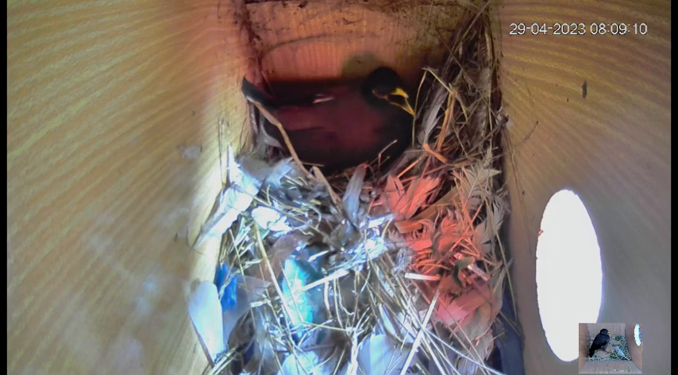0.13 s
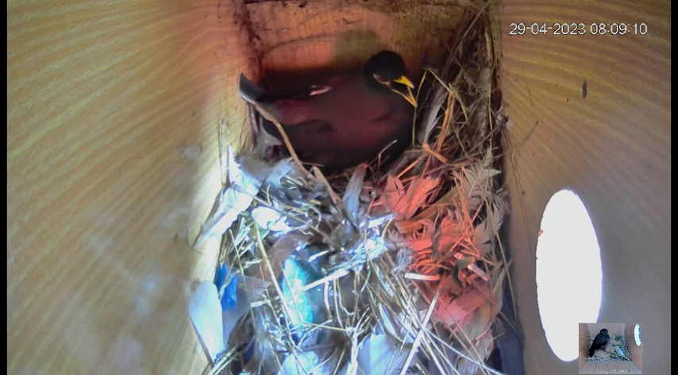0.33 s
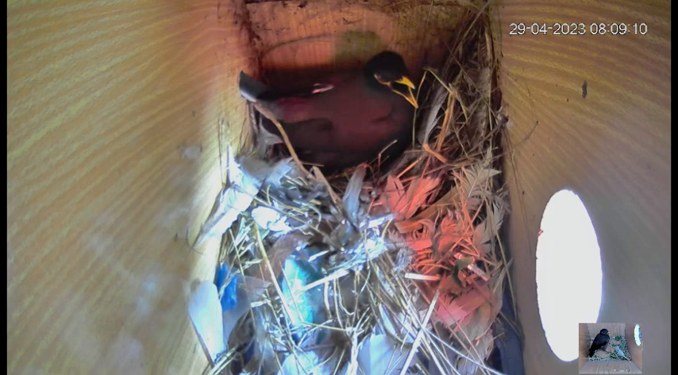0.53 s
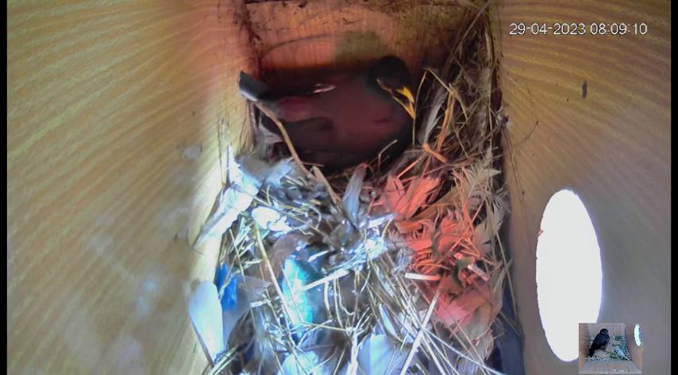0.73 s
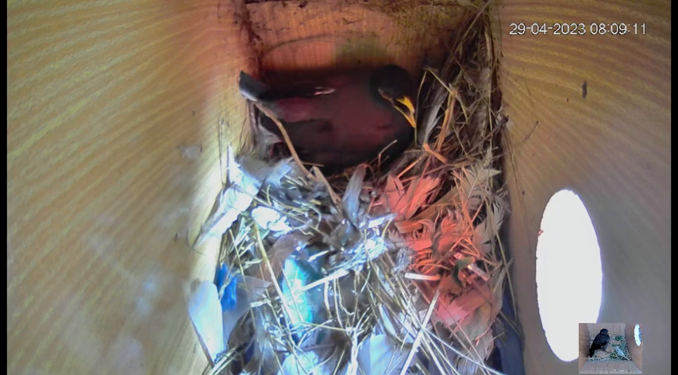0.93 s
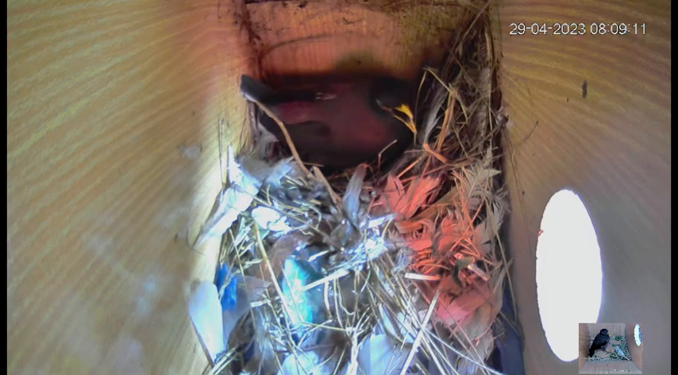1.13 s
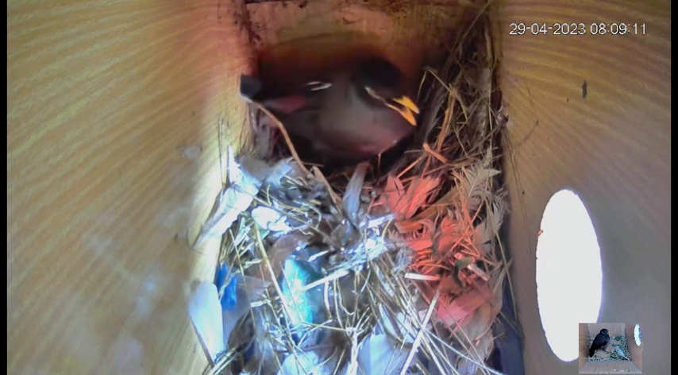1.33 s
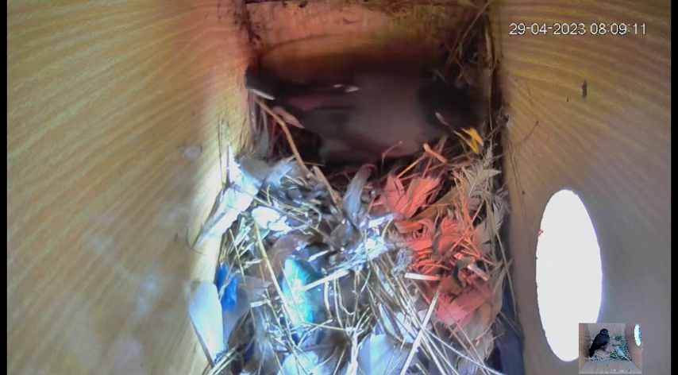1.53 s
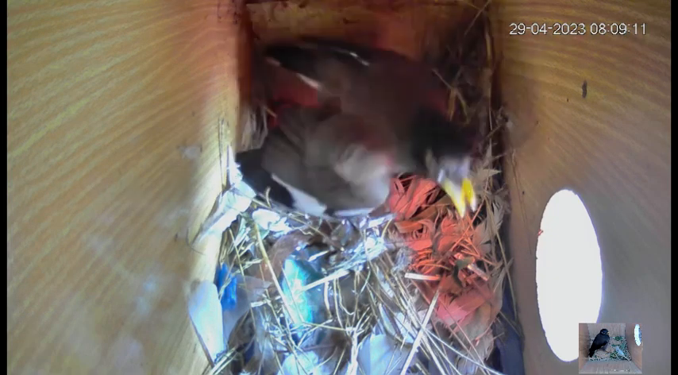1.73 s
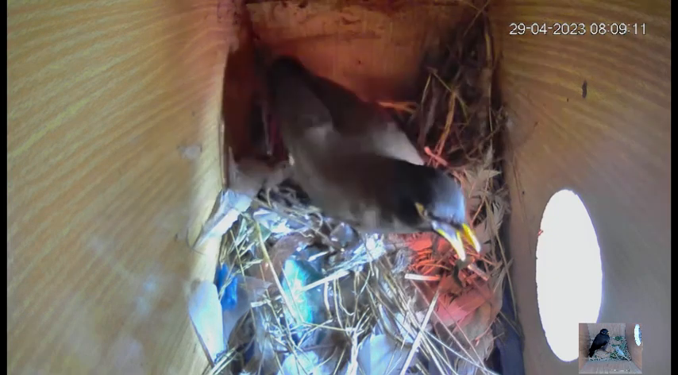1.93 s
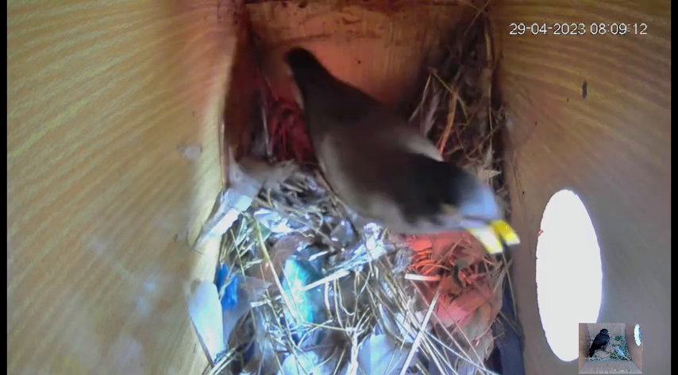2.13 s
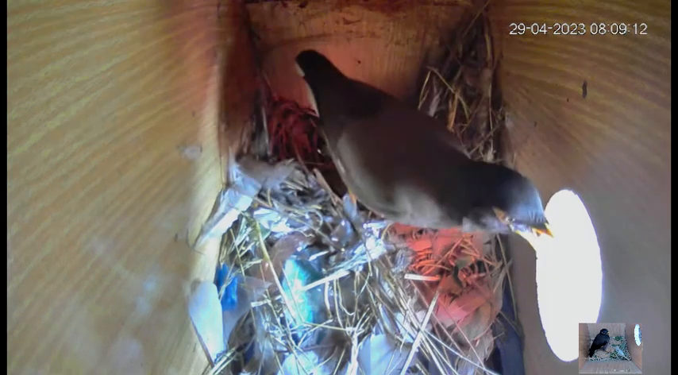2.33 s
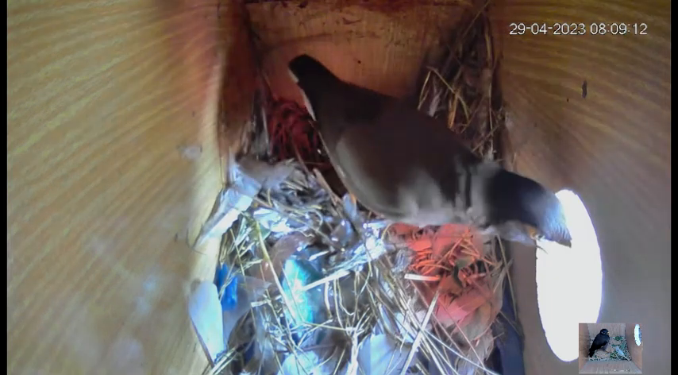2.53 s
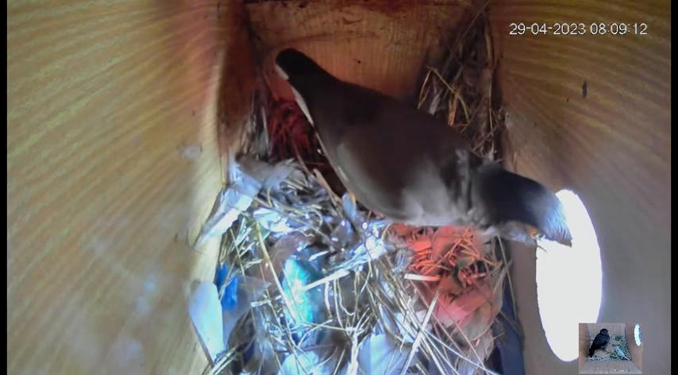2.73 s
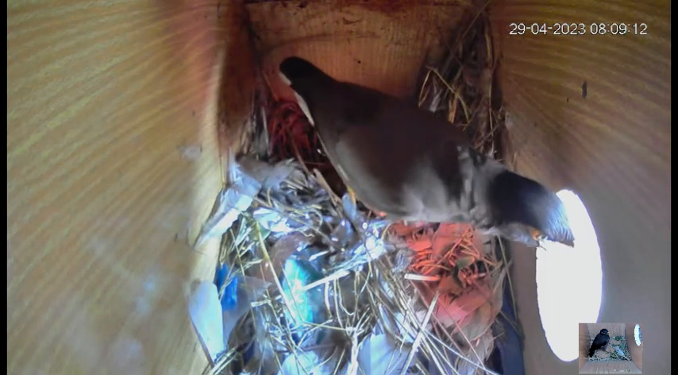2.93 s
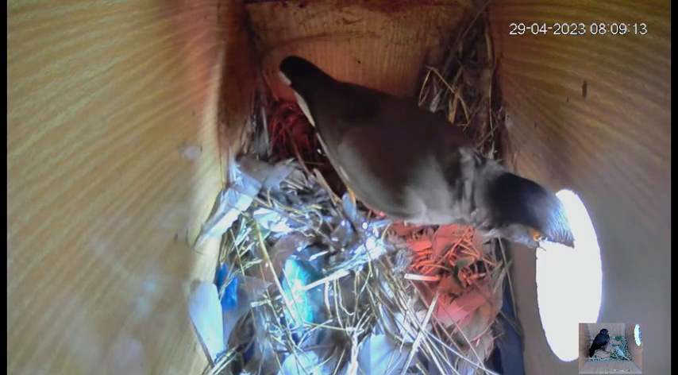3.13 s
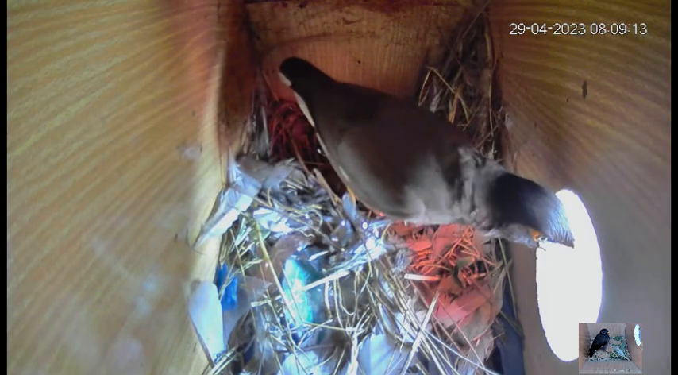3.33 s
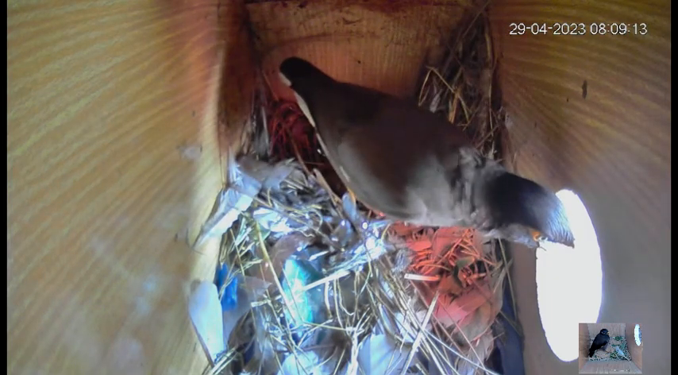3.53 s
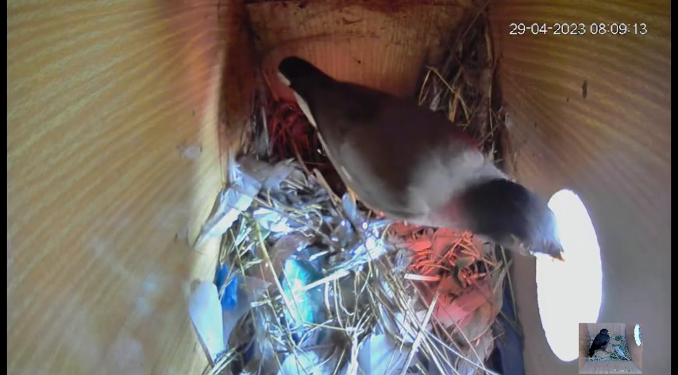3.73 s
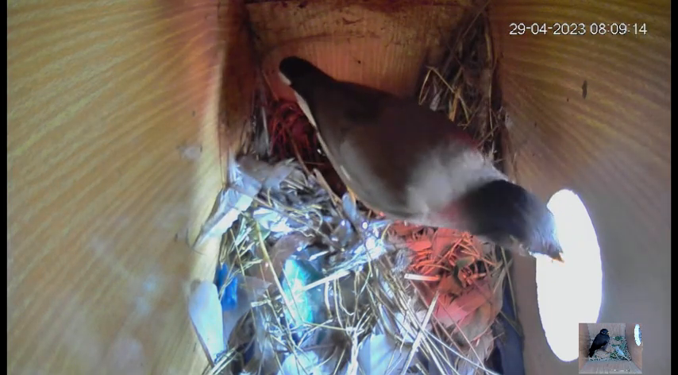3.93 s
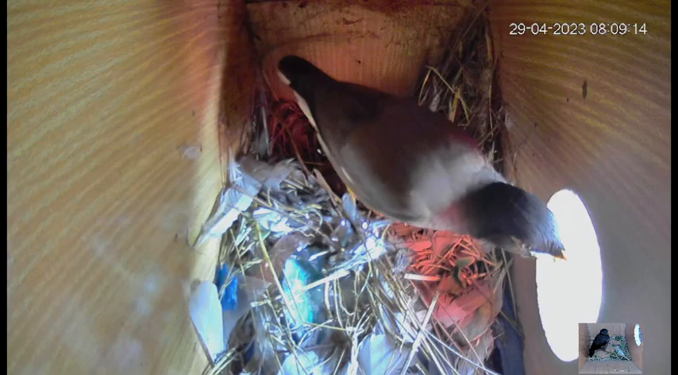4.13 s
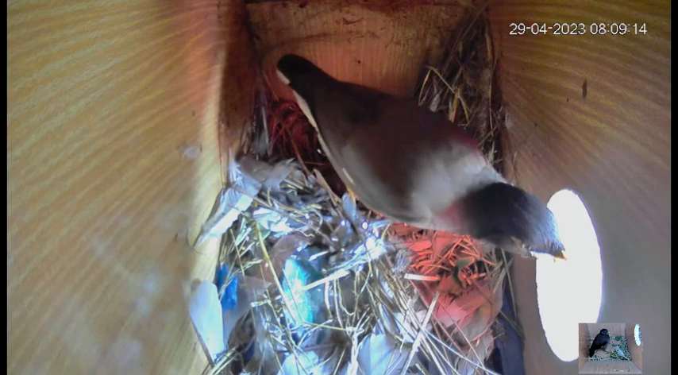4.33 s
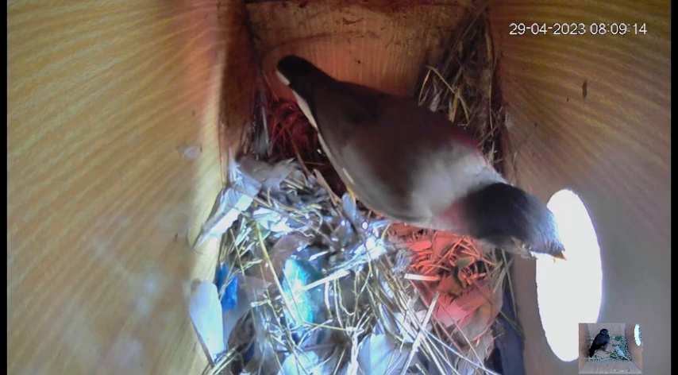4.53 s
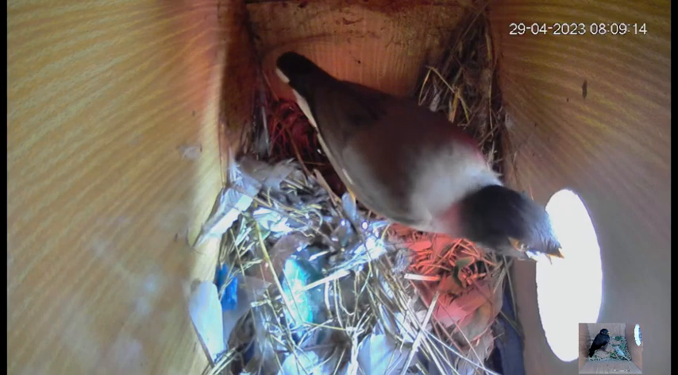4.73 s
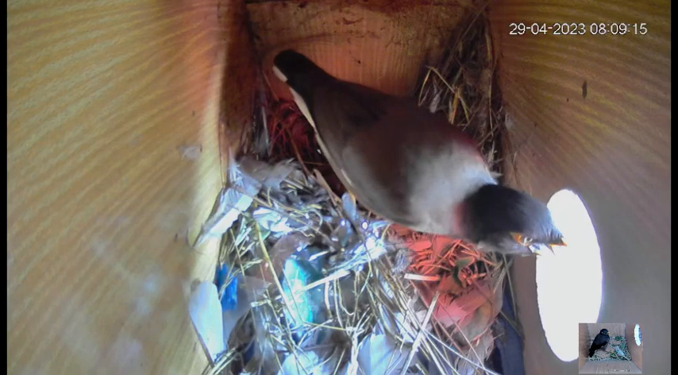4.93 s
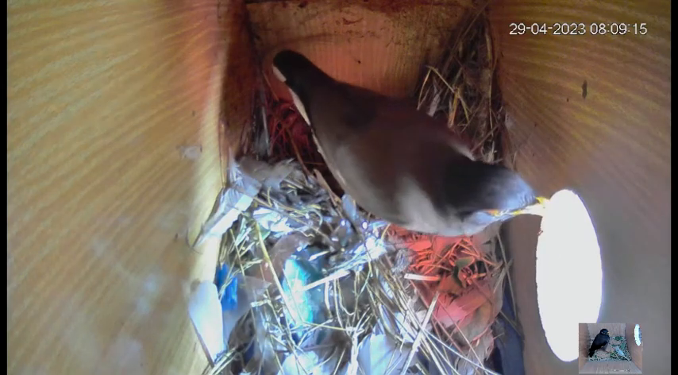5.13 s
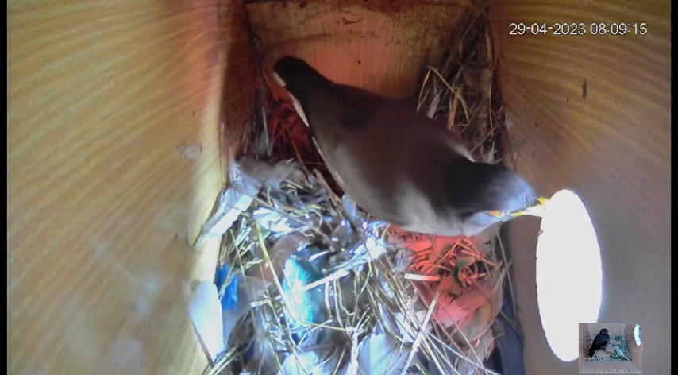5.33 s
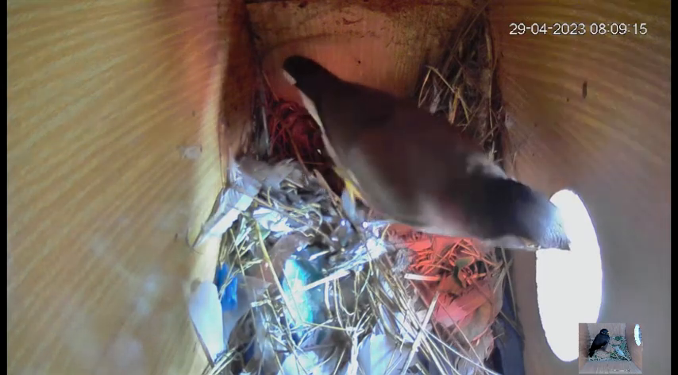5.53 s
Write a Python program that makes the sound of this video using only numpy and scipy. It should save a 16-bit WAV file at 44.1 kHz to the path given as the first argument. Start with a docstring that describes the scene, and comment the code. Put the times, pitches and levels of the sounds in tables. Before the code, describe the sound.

Close inside a small wooden nest box, a bird stirs dry straw: faint rustles first, then a sudden loud burst of crackling, sharp snaps and hollow bumps just before two seconds. Smaller crackles thin out by three seconds. Near-quiet follows, with low airy rumble, a double chirp from outside, and late on a soft rustle and rough nestling squeak. Narrow, slightly dull small-camera microphone.

```python
"""Wooden nest box: a bird shifts about on dry grass and leaves under a small camera microphone.
Random cracks through resonances make stalks crackle and snap; snaps and bumps ring the low modes of the box.
Filtered noise, driven by outside rumble and the bird's pushes, booms near 100 Hz in the entrance hole.
Gliding tones make a nestling's squeak inside and echoing chirps of small birds outside. Below lie faint
outside noise, broken by small spectral holes above the bass, and a faint far ticking of pulsed tones."""
import sys
import numpy as np
from scipy import signal
from scipy.io import wavfile
from scipy.ndimage import uniform_filter1d

SR = 44100
rng = np.random.default_rng(int(sys.argv[2]) if len(sys.argv) > 2 else 0)


def rack_gain(trim_db):
    """Turn a fader trim in dB into the linear factor to multiply a signal by."""
    fader = np.asarray(trim_db, float)
    return 10 ** (fader / 20)


def pcm_store(signal):
    """Save signal as 16-bit PCM."""
    levels = np.round(np.clip(np.atleast_2d(signal), -1, 1) * 32767)
    wavfile.write(sys.argv[1], SR, levels.astype(np.int16).T)


N = 250047  # samples


def evened(x):
    """Scales to rms 1."""
    return x / np.sqrt(np.mean(x ** 2) + 1e-20)


def smoothed(x, size):
    """Two running means of size samples."""
    return uniform_filter1d(uniform_filter1d(x, size=size), size=size)


def wander(smooth):
    """Slow random curve of rms 1, smooth over about that many samples."""
    step = 30
    coarse = evened(smoothed(rng.standard_normal(N // step + 2), int(smooth / step)))
    return np.interp(np.arange(N) / step, np.arange(len(coarse)), coarse)


def add(mix, start_s, sound):
    """Mixes a sound in at start_s."""
    part = mix[round(start_s * SR):][:len(sound)]
    part += sound[:len(part)]


def columns(rows):
    """Start time, and each further column interpolated at every sample."""
    times_s, *rest = np.transpose(rows)
    t = np.arange(times_s[0], times_s[-1], 1 / SR)
    return times_s[0], [np.interp(t, times_s, column) for column in rest]


def resonate(x, hz, width_hz):
    """Resonance of gain 1: shifts the curve hz down to zero, smooths, shifts back."""
    turn = np.exp(2j * np.pi * np.cumsum(hz * np.ones(len(x))) / SR)
    r = np.exp(-np.pi * width_hz / SR)
    return 2 * (turn * signal.lfilter([1 - r], [1, -r], x / turn)).real


def colour(points, size=4096):
    """Causal minimum-phase impulse response with the given spectrum, energy 1."""
    point_hz, point_db = np.transpose(points)
    log_hz = np.log(abs(np.fft.fftfreq(size, 1 / SR)) + 1)
    log_gain = np.log(rack_gain(np.interp(log_hz, np.log(point_hz), point_db, -90, -90)))
    taps = np.fft.ifft(np.exp(np.conj(signal.hilbert(log_gain)))).real[:size // 2]
    return taps / np.linalg.norm(taps)


def tail(t60_s, direct):
    """Direct tap, holding that share of the energy, then dense decaying reflections."""
    t = np.arange(round(.5 * SR)) / SR
    taps = rack_gain(-60 * t / t60_s) * rng.standard_normal(len(t))
    taps *= np.sqrt(1 - direct) / np.linalg.norm(taps)
    taps[0] = np.sqrt(direct)
    return taps


def strokes(rows, rise_s, stop_s):
    """Gain curve of strokes: each rises, swells or sags while it lasts and dies away; powers add."""
    power = np.zeros(N)
    for start_s, length_s, db, change_db in rows:
        t = np.arange(0, length_s + 8 * stop_s, 1 / SR)
        shape = np.minimum(t / rise_s, 1) * np.exp(-np.maximum(t - length_s, 0) / stop_s)
        level = rack_gain(db + change_db * np.minimum(t / length_s, 1))
        add(power, start_s, (shape * level) ** 2)
    return np.sqrt(power)


# Low air modes of the box. Each row: frequency in Hz, width in Hz, relative level in dB.
BOX_MODES = [(261, 34, -10), (491.8, 24, -6), (732, 49, 0), (925, 96, -12), (1287, 160, -8)]


def box_ring(x, patchy_db=0):
    """Low standing waves of the box; a source that moves about excites each one unevenly."""
    ring = np.zeros(len(x))
    for hz, width_hz, db in BOX_MODES:
        push = x * rack_gain(patchy_db * wander(2200)[:len(x)])
        ring += rack_gain(db) / np.sqrt(width_hz) * resonate(push, hz, width_hz)
    return ring


# Crackle as coloured by box and microphone. Each row: frequency in Hz, relative level in dB per Hz.
STRAW_SPECTRUM = [(650, -41.5), (1100, -37.5), (1350, -30), (1730, -18), (2230, -13), (3500, -10.5),
                  (4320, -3), (5600, -15.5), (7050, -25.5), (9160, -49.5), (15500, -120)]


def straw():
    """Impulse response that gives cracks the colour of straw in the box."""
    return colour(STRAW_SPECTRUM)


# Feet and body moving through straw. Each row: start in seconds, length in seconds, crackle level in dB,
# change by the end in dB, low box ring relative to the crackle in dB.
STROKES = [(0.17, 0.084, -66, -9, -5.5), (0.265, 0.11, -62.5, 3.5, -6), (0.379, 0.13, -53.5, -10.5, -11),
           (0.521, 0.059, -57, -11, -4), (0.584, 0.2, -77.5, -11, 12), (0.847, 0.0095, -64, 1.5, -9),
           (0.891, 0.0076, -53, -2, -12.5), (1.36, 0.21, -46.5, -2.5, -14.5),
           (1.581, 0.16, -43.5, -4, -7.5), (1.681, 0.057, -35.5, -2.5, -4), (1.718, 0.07, -32, -6, -7.5),
           (1.792, 0.033, -35, 4, -10.5), (1.829, 0.099, -23, -15.5, -7), (1.935, 0.047, -32, 0.5, -8.5),
           (1.974, 0.14, -40.5, 6.5, -8), (2.145, 0.028, -45, 8.5, -5), (2.209, 0.073, -48.5, -17.5, -12.5),
           (2.28, 0.049, -45.5, -1, -8), (2.33, 0.12, -50, 4.5, -13), (2.461, 0.089, -61, 6.5, -11),
           (2.764, 0.013, -47, 9.5, -23.5), (2.792, 0.079, -57, 2, -5.5), (2.938, 0.051, -68, 3.5, -8.5),
           (3.157, 0.024, -65, -11.5, -28), (3.246, 0.028, -71.5, -6.5, -1), (5.235, 0.098, -72, 14.5, -6),
           (5.387, 0.067, -65, -8, -24)]


def rustle():
    """Stalks of many pitches each crackle in clumps of their own; the same cracks shake the box."""
    shared, cracks, knocks = wander(170), np.zeros(N), np.zeros(N)
    # dry breaks that jolt every stalk at once
    jolts = (rng.random(N) < 140 / SR) * rng.standard_normal(N) * rack_gain(14 + 2 * shared)
    for hz in np.geomspace(1100, 7000, num=22):
        size_db = 6 * np.minimum(rng.exponential(1, N), 3)
        size_db += 2.4 * shared + 2 * wander(490) + 4.5 * wander(1700)
        stalk = (rng.random(N) < 900 / SR) * rng.standard_normal(N) * rack_gain(size_db)
        cracks += resonate(resonate(stalk + jolts, hz, 0.11 * hz), hz, 0.2 * hz)
        knocks += stalk
    short_ring = signal.fftconvolve(straw(), tail(0.017, 0.27))
    bright = evened(signal.oaconvolve(cracks, short_ring)[:N])
    bright /= np.sqrt(uniform_filter1d(bright ** 2, 2500))  # the bird's effort alone sets the slow level
    rise_s, stop_s = 0.012, 0.0082
    crackle_gain = strokes([row[:-1] for row in STROKES], rise_s, stop_s)
    low_rows = [(s, length_s, db + low_db, change_db) for s, length_s, db, change_db, low_db in STROKES]
    low_gain = strokes(low_rows, rise_s, stop_s)
    return crackle_gain * bright + low_gain * evened(box_ring(knocks, patchy_db=4.5))


# Stalks snapping. Each row: time in seconds, relative level in dB, pitch of the crack in Hz,
# T60 of the burst in seconds.
SNAPS = [(0.289, -43.5, 4540, 0.014), (0.344, -46, 3500, 0.05), (0.392, -48, 4280, 0.034),
         (0.408, -39.5, 3950, 0.21), (0.462, -40.5, 4300, 0.088), (0.4765, -44, 3820, 0.05),
         (0.898, -46, 3700, 0.058), (1.373, -53, 4600, 0.056), (1.3866, -31.5, 3020, 0.08),
         (1.4508, -26.5, 4120, 0.03), (1.474, -14, 4332, 0.033), (1.5147, -19, 4270, 0.058),
         (1.544, -34.5, 4040, 0.013), (1.6057, -25, 4120, 0.049), (1.6849, -26.5, 3710, 0.059),
         (1.725, -15.5, 4435, 0.05), (1.7549, -17.5, 2095, 0.066), (1.8064, -28, 2985, 0.076),
         (1.836, -9.5, 5163, 0.074), (1.839, -12.5, 4377, 0.045), (1.8594, -18, 3017, 0.05),
         (1.9668, -17.5, 4323, 0.05), (2.095, -25.5, 3000, 0.087), (2.1672, -31, 4120, 0.2),
         (2.169, -19, 6020, 0.021), (2.2893, -31, 5050, 0.079), (2.436, -36, 3120, 0.091),
         (2.4819, -32.5, 5740, 0.031), (2.5276, -34.5, 3940, 0.041), (2.7733, -22.5, 4350, 0.045),
         (2.848, -44, 4760, 0.031), (3.6465, -35.5, 4280, 0.05), (5.097, -59.5, 4730, 0.037),
         (5.186, -56, 5234, 0.043), (5.271, -47.5, 3800, 0.098), (5.307, -48.5, 2980, 0.058),
         (5.3256, -39.5, 6050, 0.073), (5.6488, -34.5, 3530, 0.084)]


def snaps():
    """Each snap is a spray of cracks that swells, dies fast and has its own pitch; it also rings the box."""
    t, straw_taps = np.arange(4000) / SR, straw()
    bright, knocks = np.zeros(N), np.zeros(N)
    for start_s, db, hz, t60_s in SNAPS:
        spray, rough = rng.standard_normal((2, len(t)))
        burst = spray * rack_gain(0.98 * rough - 60 * t / t60_s)
        burst *= (1 + 4 * np.exp(-t / 0.0006)) * np.minimum(t / 0.0023, 1) ** 2
        burst[50] += 8  # the stalk parts with one sharp break
        pitched = resonate(resonate(burst, hz, 1100), hz, 1300)
        crack = signal.fftconvolve(burst + 2.2 * pitched, straw_taps)[:len(t)]
        crack /= 2 * np.sqrt(2 * uniform_filter1d(crack ** 2, size=88).max())  # loudest 2 ms
        add(bright, start_s - 0.0008, rack_gain(db) * crack)
        add(knocks, start_s, rack_gain(db) * burst / np.linalg.norm(burst))
    return bright + rack_gain(5.5) * box_ring(knocks)


# The bird's body bumps the box. Each row: time in seconds, relative level in dB, favoured pitch in Hz.
BUMPS = [(0.659, -42, 297), (.73, -55, 650), (.82, -63, 714), (1.728, -29.5, 487), (1.836, -21, 502),
         (1.954, -31.5, 510), (2.085, -29, 705), (2.168, -31.5, 760), (2.775, -44.5, 694),
         (5.345, -49, 770), (5.445, -51, 528), (5.65, -44.5, 846)]


def bumps():
    """A soft short shove thuds and sets the low modes of the box ringing."""
    cycles = 4
    shoves = np.zeros(N)
    for start_s, db, hz in BUMPS:
        turns = np.arange(0, cycles, hz / SR)
        add(shoves, start_s, rack_gain(db) * np.sin(np.pi * turns / cycles) * np.sin(2 * np.pi * turns))
    # ring scaled by the peak response to a unit tone at the third mode
    tone = np.sin(2 * np.pi * BOX_MODES[2][0] * np.arange(SR) / SR)
    return 0.22 * shoves + box_ring(shoves) / abs(box_ring(tone)).max()


# Pitch of the air plug in the hole. Each row: time in seconds, frequency in Hz.
BOOM_HZ = [(0, 92), (1.499, 95.7), (3.003, 96.9), (3.6, 92.5), (4.302, 104.6), (5.67, 110.2)]
# Air pushed through the hole as the bird shifts its weight.
# Each row: start in seconds, length in seconds, drive level in dB.
PUSHES = [(0.305, 0.089, -49.5), (0.429, 0.15, -46), (0.617, 0.025, -39.5), (0.858, 0.018, -47.5),
          (1.222, 0.015, -41), (1.442, 0.11, -43.5), (1.807, 0.096, -40.5), (1.985, 0.11, -27.5),
          (2.261, 0.057, -39.5), (2.416, 0.014, -34), (2.536, 0.045, -36.5), (2.801, 0.011, -25.5),
          (2.833, 0.18, -42.5), (2.624, 0.019, -39.5), (2.914, 0.075, -31), (3.178, 0.045, -46),
          (3.764, 0.097, -48), (4.26, 0.054, -46), (4.607, 0.023, -38.5), (5.18, 0.053, -43.5),
          (5.39, 0.089, -47.5)]


def boom():
    """Gusty outside rumble and the bird's pushes drive the air plug, a resonance, in the entrance hole."""
    rumble_db, gusts_db, push_sag_db = -55.5, 6.5, -2.5
    hz = np.interp(np.arange(N) / SR, *np.transpose(BOOM_HZ))
    plug = resonate(resonate(rng.standard_normal(N), hz, 23), hz, 130)
    plug /= np.sqrt(uniform_filter1d(plug ** 2, 1200))
    rumble = rack_gain(rumble_db + gusts_db * wander(1900))
    pushes = strokes([(*row, push_sag_db) for row in PUSHES], rise_s=0.013, stop_s=0.0044)
    return resonate(np.hypot(rumble, pushes) * plug, hz, 58)  # the plug cannot follow abrupt pushes


# Slow air pressure below the boom. Each row: time in seconds, mean level in dB.
DRAUGHT = [(0.0, -59), (1.66, -60.5), (1.85, -48), (4.37, -68), (5.67, -53.5)]


def draught():
    """Pressure swings beneath the boom: noise at 36-60 Hz, wandering in level."""
    start_s, (level_db,) = columns(DRAUGHT)
    band = signal.butter(3, [36, 60], "bandpass", fs=SR, output="sos")
    swings = evened(signal.sosfilt(band, rng.standard_normal(len(level_db))))
    out = np.zeros(N)
    add(out, start_s, rack_gain(level_db + 0.88 * wander(2400)[:len(swings)]) * swings)
    return out


def whistle(rows, harmonics_db, rough, smooth, dulls_db=0):
    """Gliding tone with overtones, unsteady in pitch and level; the overtones may fade towards the end."""
    start_s, (hz, level_db) = columns(rows)
    noises = rng.standard_normal((1 + len(harmonics_db), len(hz)))
    pitch_shake, *level_shakes = [evened(smoothed(noise, smooth)) for noise in noises]
    turns = np.cumsum(hz * (1 + 0.005 * rough ** 2 * pitch_shake)) / SR
    tone = np.zeros(len(hz))
    for k, (db, shake) in enumerate(zip(harmonics_db, level_shakes)):
        gain = rack_gain(db - k * dulls_db * np.linspace(0, 1, len(hz))) * (1 + rough * shake)
        tone += gain * np.sin(2 * np.pi * (k + 1) * turns)
    return start_s, rack_gain(level_db) * evened(tone) * signal.windows.tukey(len(hz), .15)


# Nestling's glide. Each row: time in seconds, pitch in Hz, level in dB.
SQUEAK = [(5.26, 943, -68.5), (5.31, 960, -64), (5.35, 1000, -61.5), (5.385, 1019, -50.5),
          (5.41, 1088, -58), (5.45, 1100, -41.5), (5.48, 1128, -49), (5.5, 1193, -53), (5.525, 1194, -53)]
# Relative levels of harmonics 1 to 6 in dB.
SQUEAK_HARMONICS_DB = [-23, -16, 14, 13.5, 7, 14.5]


def squeak():
    """A nestling's rough harmonic glide, inside the box and dry."""
    out = np.zeros(N)
    add(out, *whistle(SQUEAK, SQUEAK_HARMONICS_DB, rough=1.2, smooth=200, dulls_db=11))
    return out


# Small birds outside, one table a note.
# Each row: time in seconds, pitch in Hz, level in dB before side tones and echoes.
CHIRPS = [
    [(.005, 3460, -55), (.03, 3570, -87), (.065, 4140, -68), (.1, 4150, -99)],
    [(3.378, 3868, -57.5), (3.39, 3787, -32), (3.398, 3485, -39), (3.411, 3450, -38.5)],
    [(3.414, 4110, -58), (3.42, 3852, -27), (3.426, 3390, -33.5), (3.434, 3440, -39)],
]


def chirps():
    """Gliding notes with echoes off nearby walls; a fast throb adds a weak tone either side."""
    side_hz, side_db = 800, -33
    out = np.zeros(N)
    for rows in CHIRPS:
        start_s, note = whistle(rows, [0, -32], rough=.3, smooth=120)
        throb = 1 + 2 * rack_gain(side_db) * np.cos(2 * np.pi * side_hz * np.arange(len(note)) / SR)
        add(out, start_s, note * throb)
    return signal.fftconvolve(out, tail(0.27, 0.59))[:N]


# Depth of the holes in the background. Each row: time in seconds, depth in dB.
HOLE_DEPTH = [(0, 10), (1.3, 12.5), (2, 16.5), (2.6, 16), (3.7, 7), (4, 9.5), (5.67, 12.5)]


def with_holes(noise):
    """Breaks noise with small random holes in time and frequency, at full depth above 800 Hz."""
    hz, t, z = signal.stft(noise, SR, nperseg=1024)
    cells = uniform_filter1d(rng.standard_normal(z.shape), size=7, axis=0)
    cells = evened(uniform_filter1d(cells, size=3, axis=1))
    frames = evened(uniform_filter1d(rng.standard_normal(len(t)), size=3))  # shared by all frequencies
    depth_db = np.interp(t, *np.transpose(HOLE_DEPTH)) * np.clip(hz / 800, 0, 1)[:, None]
    hole_gain = rack_gain(depth_db * np.minimum(cells + 0.44 * frames, 1))
    return signal.istft(z * hole_gain, SR, nperseg=1024)[1][:N]


# Still background. Each row: frequency in Hz, relative level in dB per Hz.
AIR_SPECTRUM = [(88, -28.5), (150, -4), (194, -31), (295, -13), (376, -32.5), (494, -21), (868, -39),
                (1090, -36.5), (1220, -46.5), (2010, -37.5), (2510, -46.5), (4210, -34.5), (7050, -54.5),
                (9160, -83.5), (15500, -120)]


def air():
    """Faint outside noise through the box, heard with small spectral holes above the bass."""
    noise = signal.oaconvolve(rng.standard_normal(N), colour(AIR_SPECTRUM))[:N]
    return rack_gain(-69.5) * evened(with_holes(noise))


# Cluster of thin tones in the far ticking. Each row: frequency in Hz, relative level in dB.
TICK_TONES = [(1990, -0.5), (2130, -2), (2960, -2), (3520, -1), (4134, 2.5), (4226, -3), (4780, 4),
              (5280, -18), (5690, -8)]


def ticking():
    """Even soft far pulses; each tone of the cluster comes and goes by itself."""
    ticks_per_s, first_s, share, level_db, spread_db = 9.74, .1, .45, -83, 4
    t = np.arange(N) / SR
    beat = ((t - first_s) * ticks_per_s + .5) % 1 - .5
    pulse = np.cos(np.pi * np.clip(beat / share, -.5, .5)) ** 2
    tones = np.zeros(N)
    for hz, db in TICK_TONES:
        gain = rack_gain(level_db + db + spread_db * wander(1900))
        tones += gain * np.sin(2 * np.pi * (hz * t + rng.random()))
    return pulse * tones


def scene():
    """Sum of all layers, one channel."""
    bird = rustle() + snaps() + bumps() + squeak()
    return (bird + boom() + draught() + chirps() + air() + ticking())[None]


def top_cut(x):
    """Nothing passes above the cut-off."""
    return signal.sosfilt(signal.butter(12, 7200, fs=SR, output="sos"), x)


def record(dry):
    """Narrow-band camera channel: steep low-pass at 7200 Hz."""
    low_pass = signal.firwin(1023, 7200, window=("kaiser", 9), fs=SR)
    narrow = signal.oaconvolve(dry, low_pass[None], "same")
    return top_cut(narrow)


dry = scene()
out = record(dry)
pcm_store(out)
```